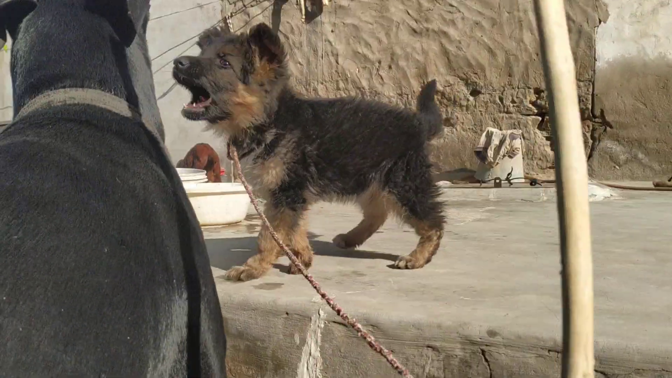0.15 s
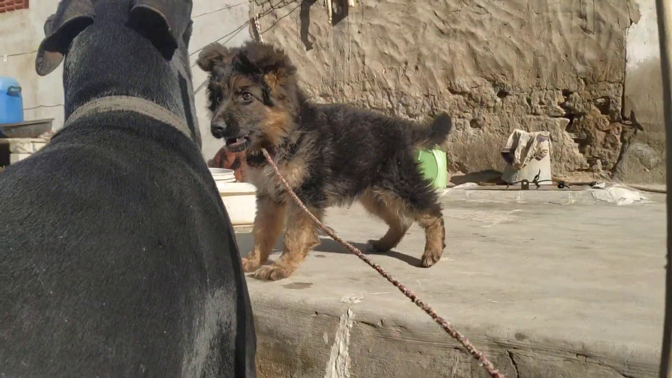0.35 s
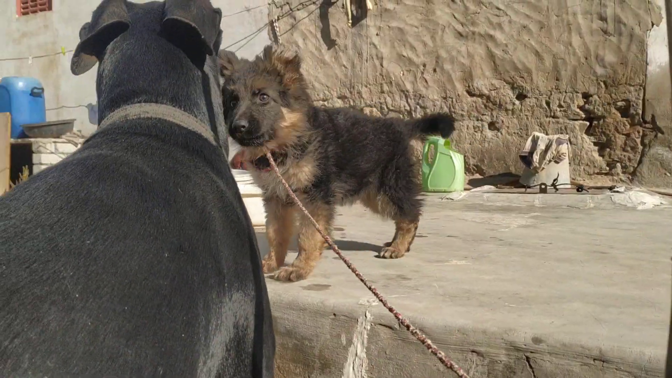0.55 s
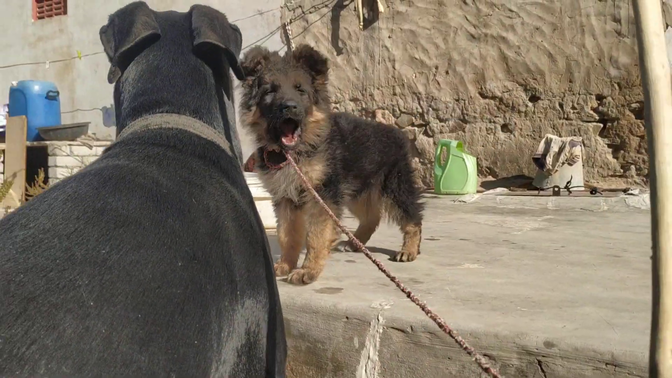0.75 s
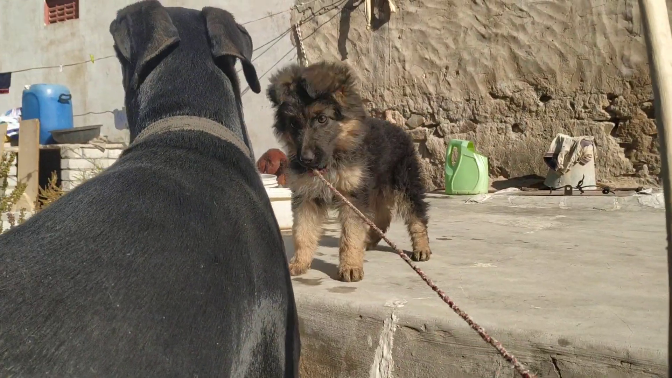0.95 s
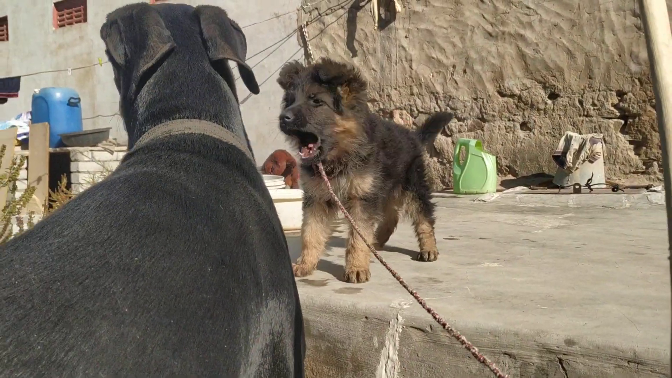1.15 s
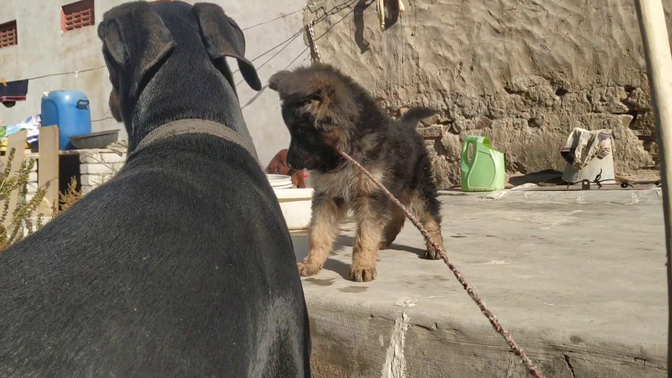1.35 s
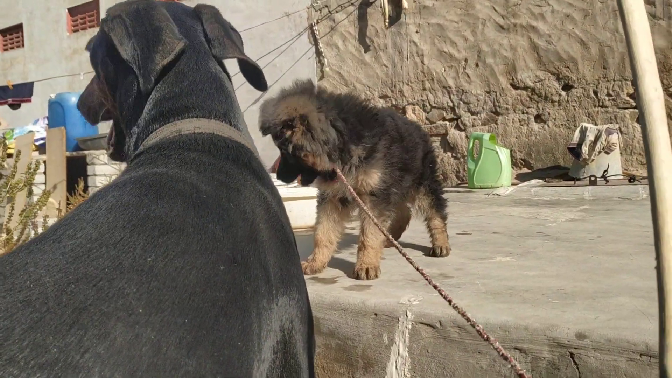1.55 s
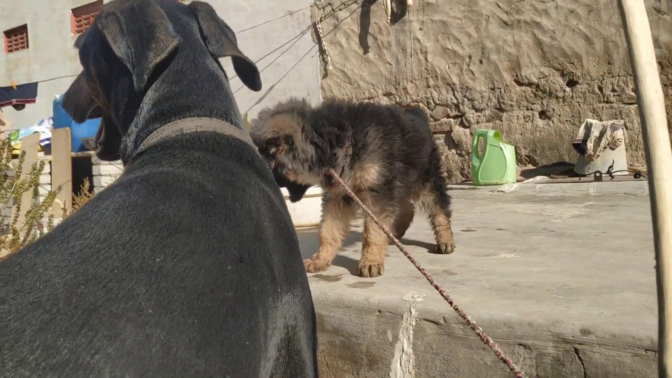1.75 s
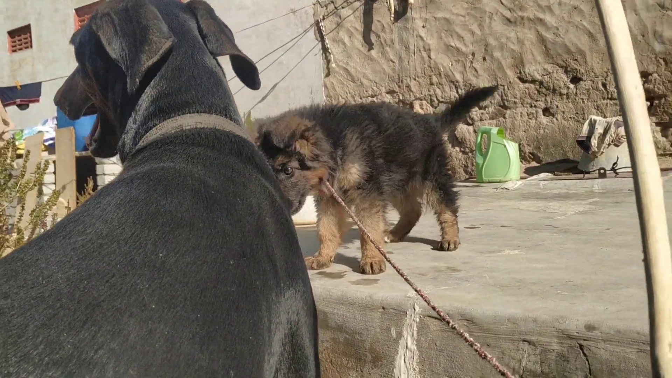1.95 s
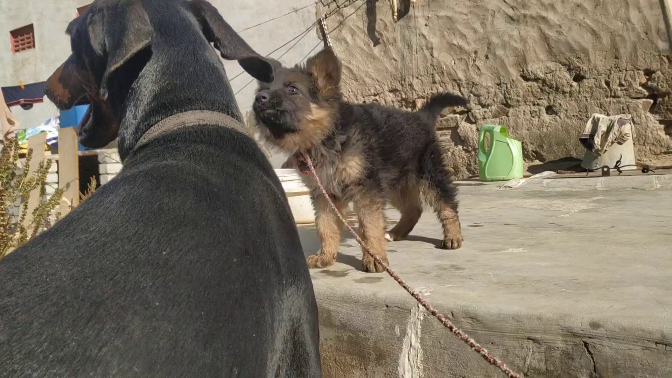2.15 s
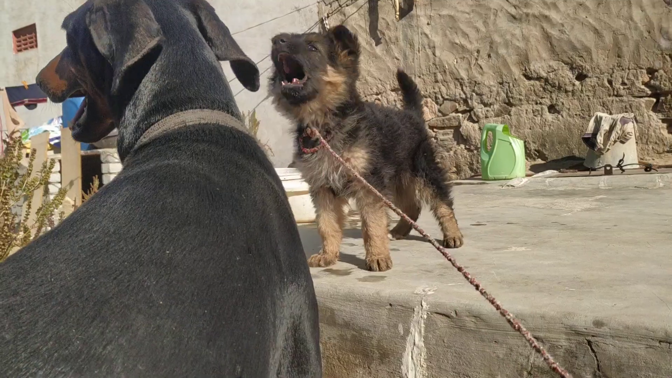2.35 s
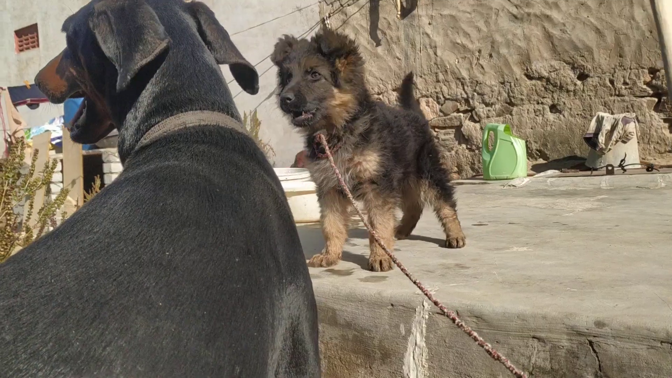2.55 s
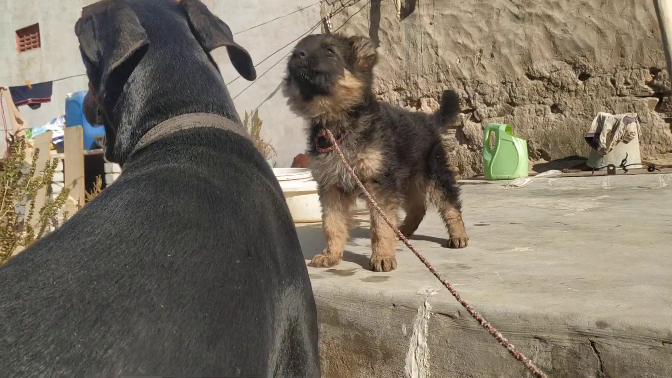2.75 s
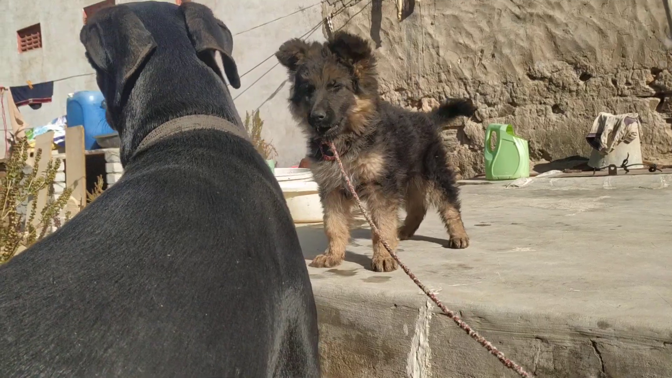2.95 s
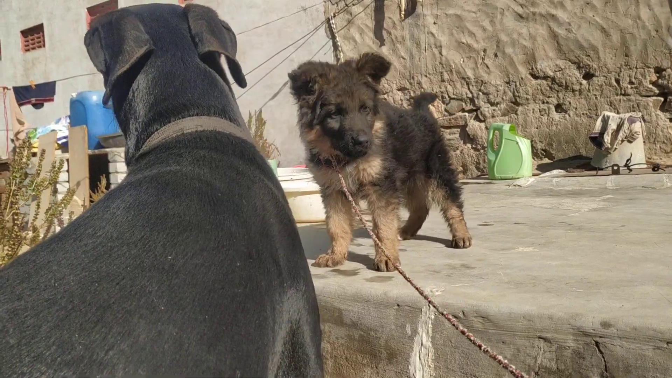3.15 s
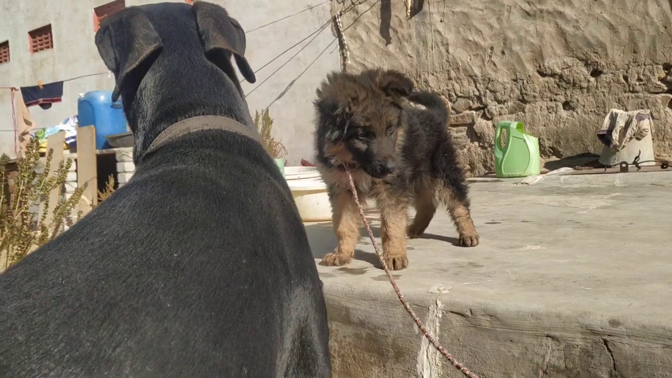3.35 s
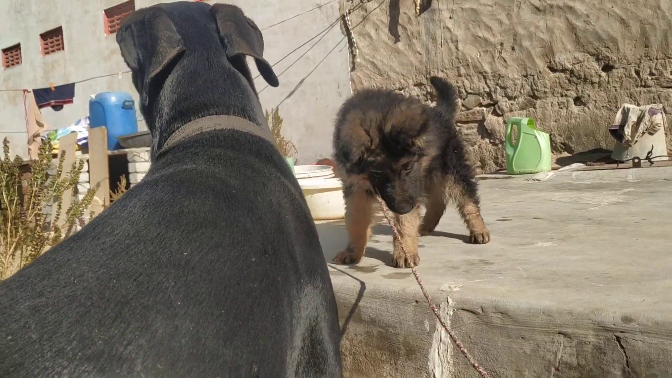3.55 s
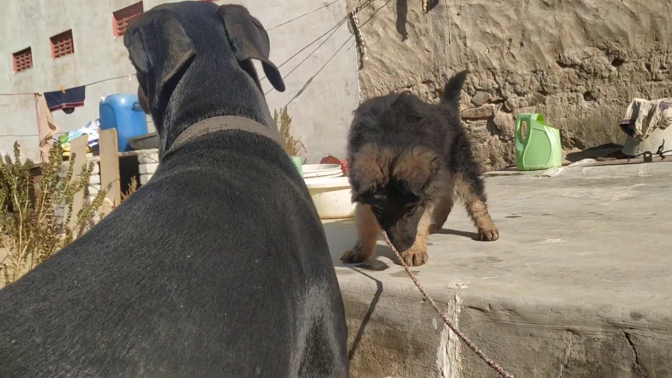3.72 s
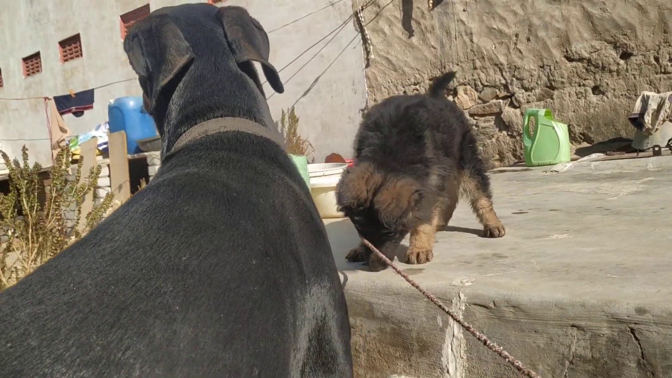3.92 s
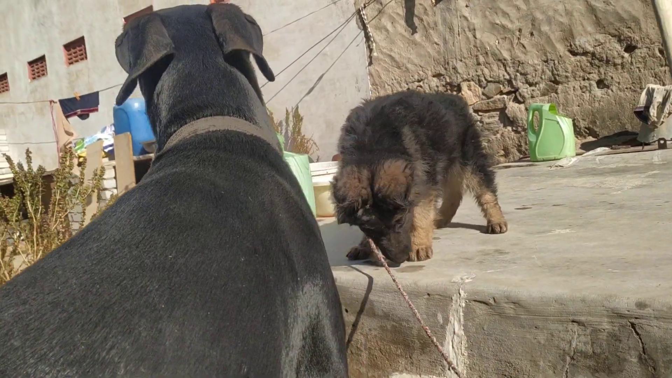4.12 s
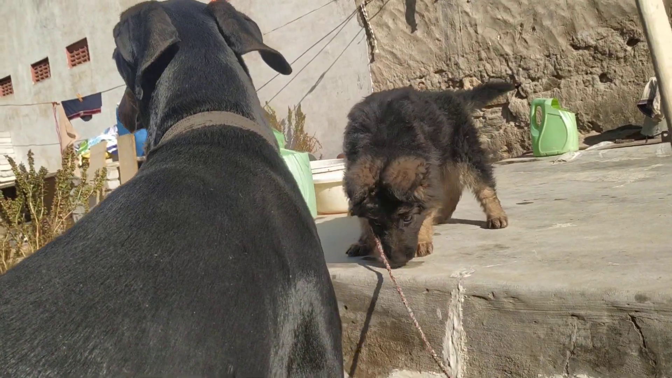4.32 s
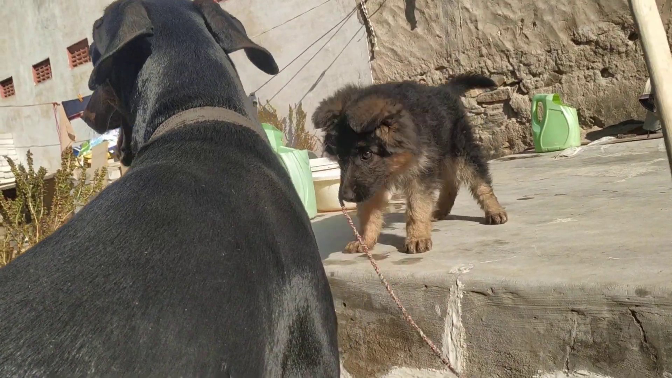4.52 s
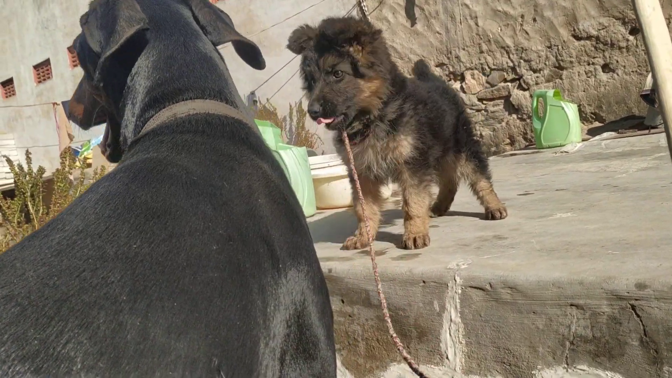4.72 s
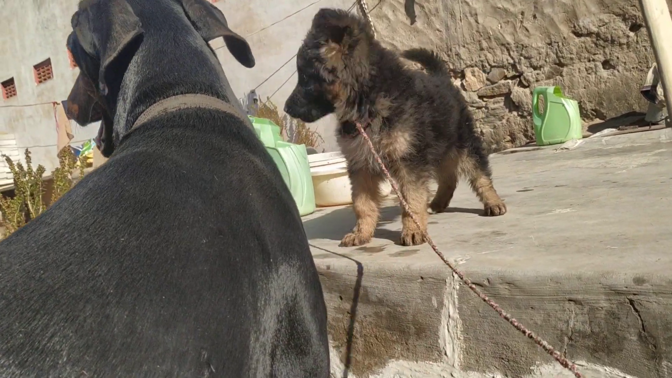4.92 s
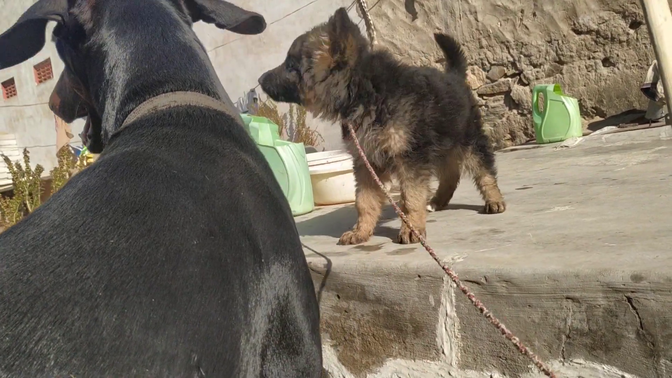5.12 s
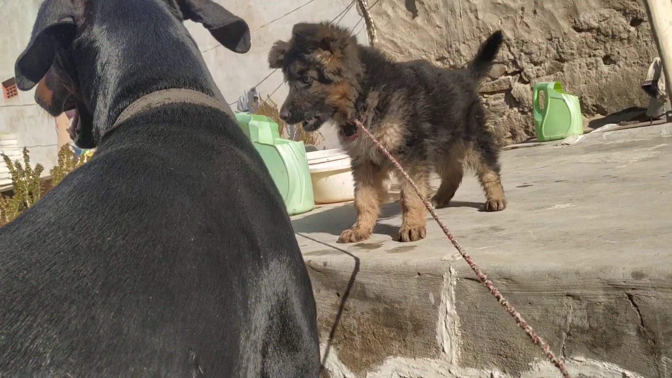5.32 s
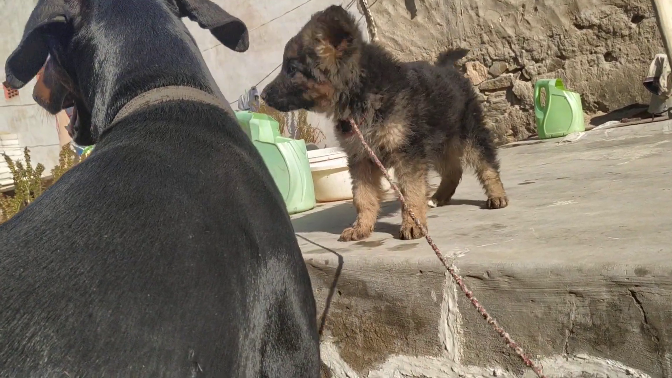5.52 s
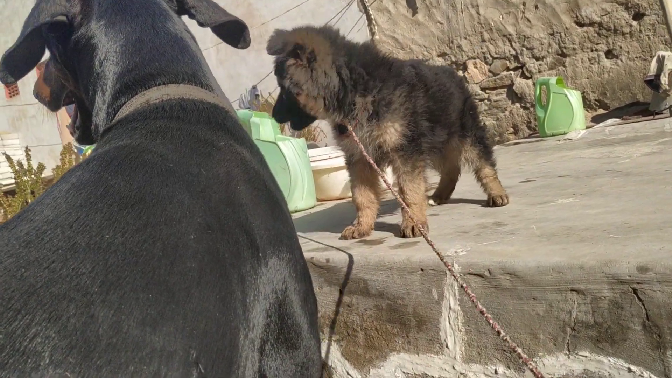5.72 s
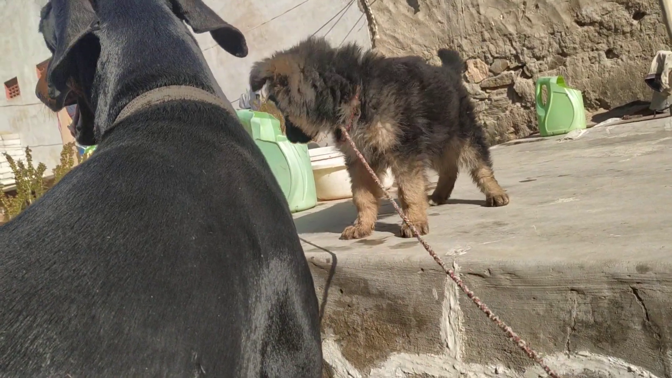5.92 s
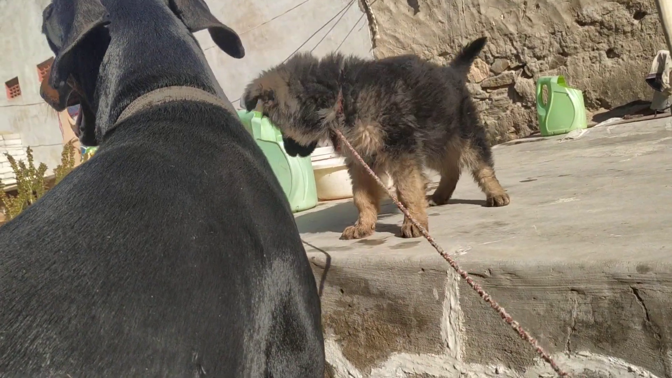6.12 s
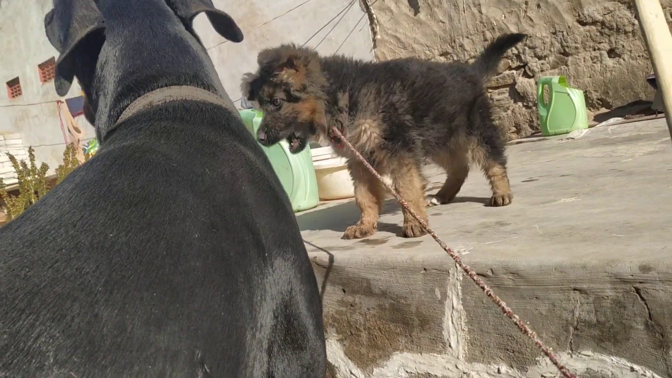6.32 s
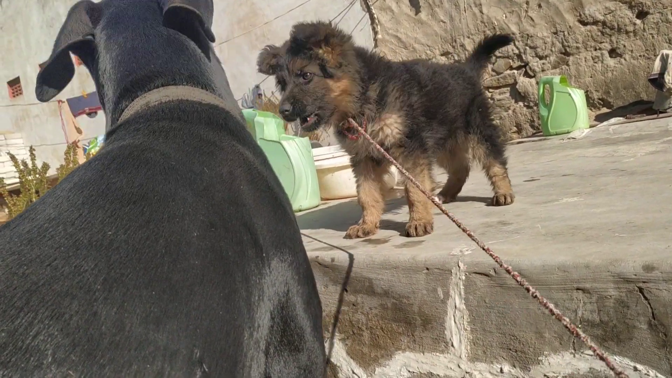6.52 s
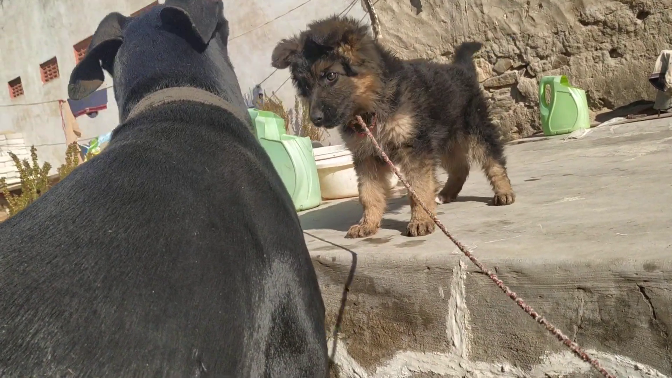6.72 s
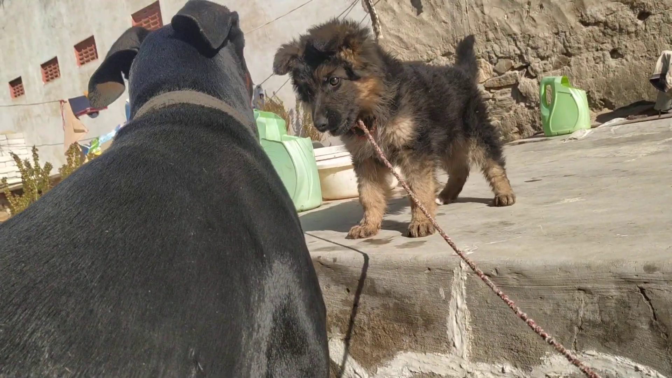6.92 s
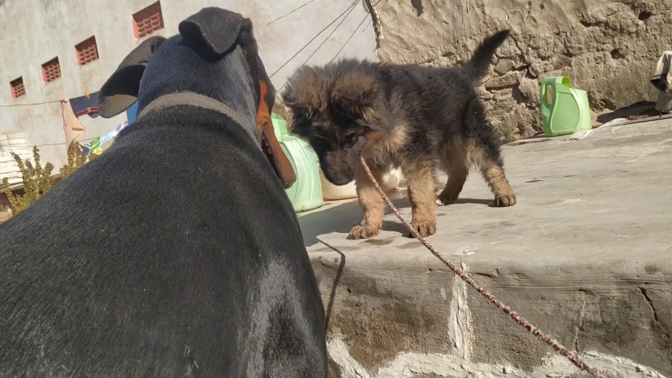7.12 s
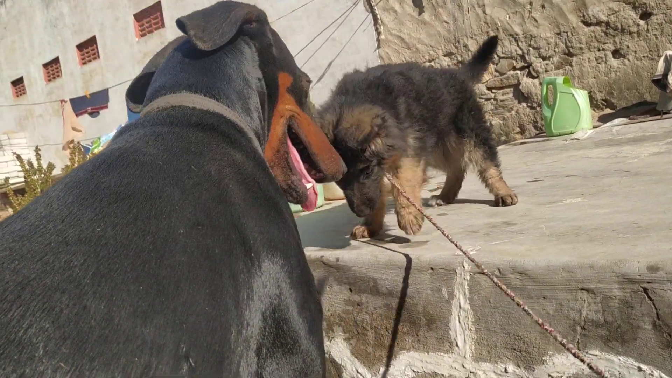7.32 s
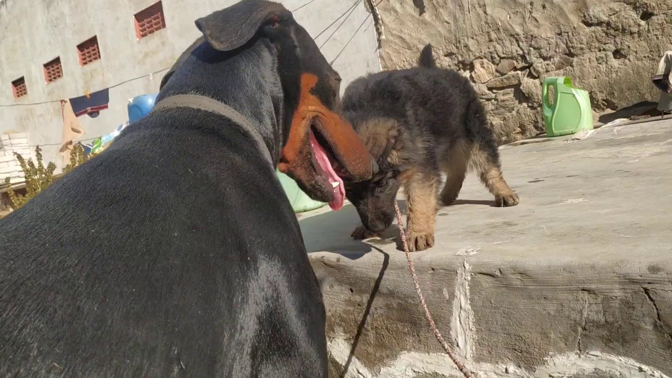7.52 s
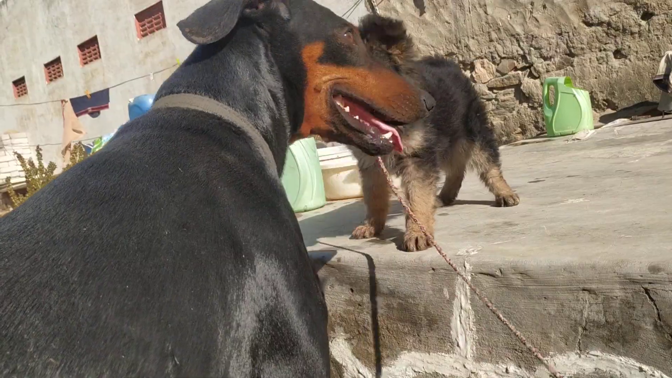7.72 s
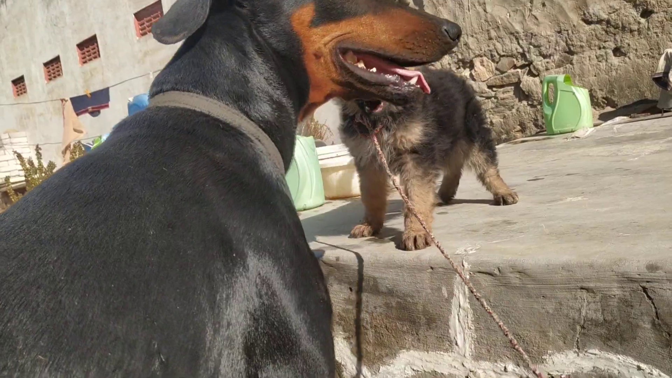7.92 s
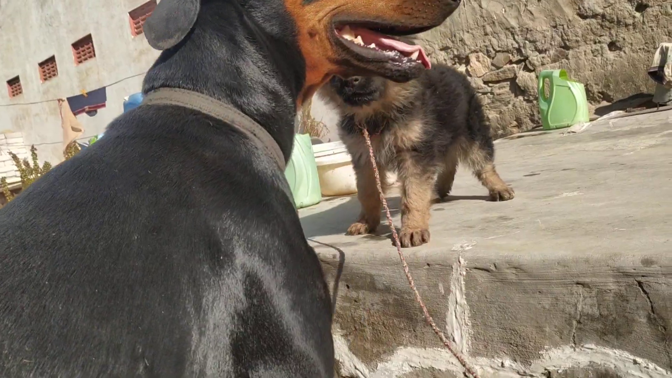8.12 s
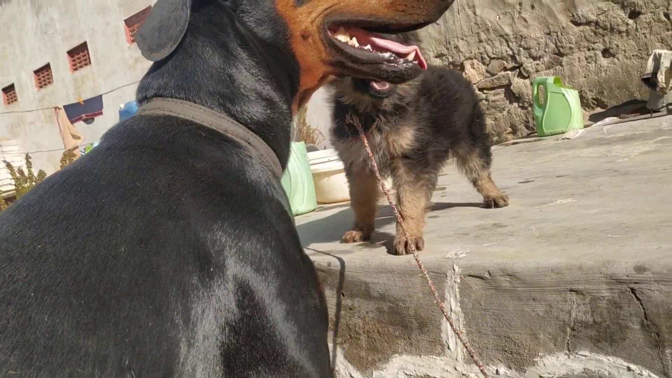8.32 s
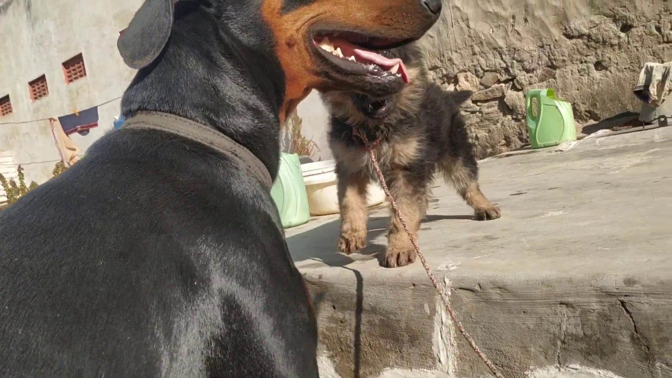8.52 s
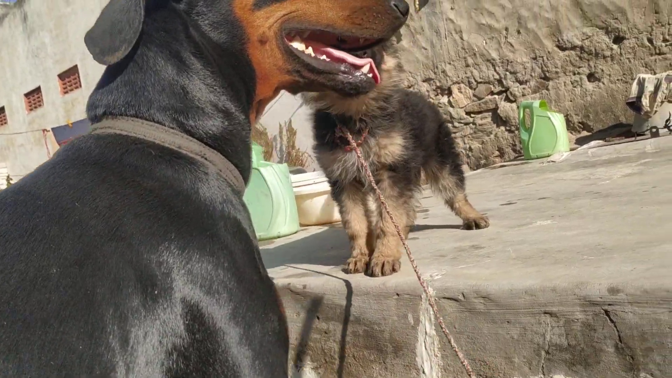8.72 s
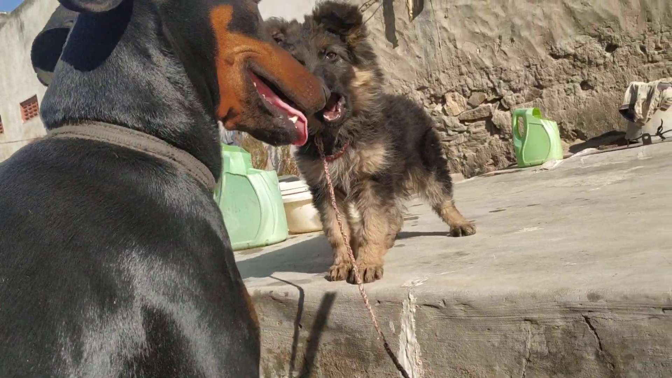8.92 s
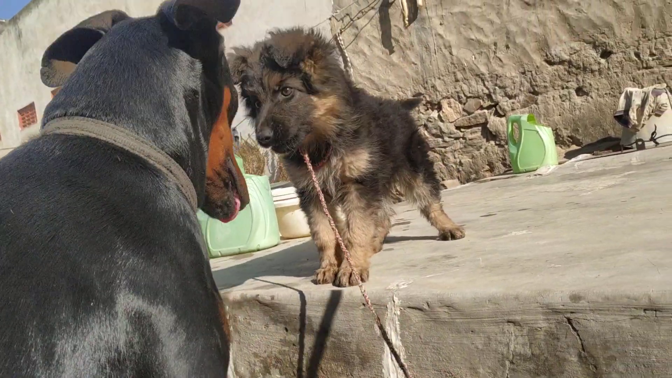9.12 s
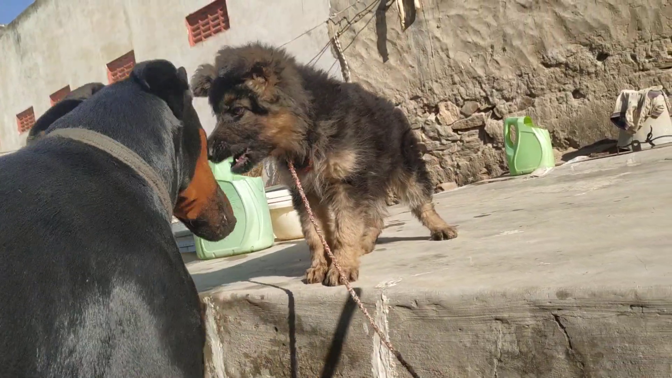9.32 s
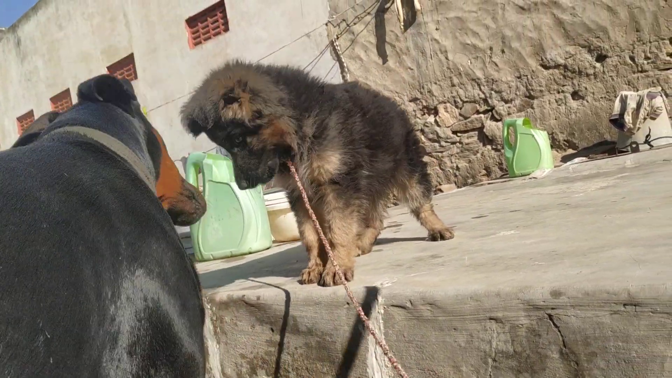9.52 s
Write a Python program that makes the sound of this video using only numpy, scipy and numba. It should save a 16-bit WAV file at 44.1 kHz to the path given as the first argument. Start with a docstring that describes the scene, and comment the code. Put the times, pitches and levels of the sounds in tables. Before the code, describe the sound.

A young puppy on a concrete step barks close to the microphone, in two runs of quick, sharp yaps about a third of a second apart, with a pause of under a second between. Many barks crack into rasp and end in a tiny growl. Walls answer briefly; paws and leash scuff softly over low rumble, hiss and light wind.

```python
"""Sharp barks in two runs, with one low, flat grunt: a puppy on a concrete step in a walled yard, a metre or two
from the microphone. Each bark is an arch of pitch that starts clear, often breaks into rasp at its crest and sinks
into a short growl; vocal-fold harmonics and noise ring in throat and muzzle, with shaped noise at the teeth.
Paws and leash scuff the concrete as noise swells, with a few claw ticks; decaying noise makes the walls answer.
An earlier bark's ring dies at the opening, then faint narrow rings, over low rumble, wide hiss and light wind."""
import sys
import numpy as np
from scipy import signal
from scipy.fft import rfft, irfft, next_fast_len
from scipy.io import wavfile
from scipy.ndimage import uniform_filter1d
from numba import njit

SR = 44100
rng = np.random.default_rng(int(sys.argv[2]) if len(sys.argv) > 2 else 0)


def transcribe(u):
    """Save the signal u as a 16-bit wav file named by the first command-line argument.

    u: samples, shape (n,) or (channels, n), limited to [-1, 1]; the rate is SR.
    q: integer samples, one column per channel.
    """
    v = np.clip(np.atleast_2d(u).T, -1, 1)
    q = np.round(v * 32767).astype(np.int16)
    wavfile.write(sys.argv[1], SR, q)


N = 426006
TIME = np.arange(N) / SR

# barks, each an arch of pitch, and one low, flat grunt at 7.64 s:
# start t/s, length t/s, attack t/s, start to crest t/s, rise t/s, fall t/s,
# crest f/Hz, throat level/dB and muzzle level/dB (relative, before each part's trim), roughness/0-1 before and
# after the crest, jaw resonance f/Hz (open mouth), muzzle resonance f/Hz (at the crest), bared-teeth level/dB
BARKS = [ (0.093, 0.17, .018, 0.076, 0.058, 0.043, 587.6, -18.5, -14, 0.25, 0.75, 1076, 1890, 5.5),
         (.418, .171, .015, .068, 0.063, 0.054, 596, -20, -14.5, 0.28, 0.76, 1074, 1942, 3.5),
         (.751, 0.18, .014, 0.07, .063, 0.045, 587, -19, -14.5, 0.29, .8, 1100, 1834, 5),
         (1.128, 0.17, .014, 0.067, 0.061, 0.056, 596, -19, -14, 0.61, .78, 1130, 1961, 1),
         (1.693, 0.21, .03, 0.096, .05, .059, 604.5, -19.5, -16, .3, 0.77, 1076, 1929, 1),
         (2.071, 0.21, .016, 0.045, 0.034, 0.075, 700, -17.5, -13.5, .52, 0.65, 1267, 2035, 1),
         (2.281, 0.17, .016, 0.088, 0.071, 0.045, 547, -18.5, -15.5, 0.3, 0.77, 1067, 1900, 3.5),
         (2.648, .17, .014, 0.075, 0.069, 0.048, 585.4, -19, -14.5, 0.36, 0.8, 1084, 1899, 3),
         (3.012, 0.15, .018, .067, 0.048, .042, 760, -19, -15.5, 0.4, 0.4, 1110, 1920, 2),
         (3.368, .2, .035, 0.095, 0.039, 0.043, 677.3, -20.5, -17.5, 0.13, 0.23, 1139, 1966, 2),
         (3.747, 0.14, .025, 0.06, 0.036, 0.045, 434.3, -24, -18.5, 0.38, 0.52, 934.6, 2043, 1),
         (4.734, 0.14, .02, .067, 0.07, 0.044, 751.7, -18.5, -14, 0.5, .7, 1245, 2024, 1),
         (5.002, 0.17, .014, 0.078, 0.06, .046, 632, -17, -14.5, 0.28, 0.8, 1236, 2068, -1.5),
         (5.354, .165, .016, 0.08, 0.06, 0.047, 613, -18.5, -14.5, .2, 0.83, 1135, 1980, 0.5),
         (5.699, 0.13, .03, 0.077, .032, .05, 337.6, -28, -26.5, 0.26, .35, 943.4, 1940, 1),
         (6.171, 0.26, .03, 0.14, 0.049, 0.042, 489, -23, -22.5, .3, 0.5, 998.5, 1950, 1.5),
         (6.391, 0.27, .02, .1, .047, .065, 428, -24, -21, .2, 0.38, 902, 1888, 4.5),
         (6.96, 0.2, .025, 0.093, 0.036, .041, 678.6, -22, -18.5, 0.14, .2, 1266, 2085, -3.5),
         (7.342, 0.13, .016, 0.067, 0.035, 0.029, 709.7, -21, -14.5, 0.16, .45, 1170, 2055, -1.5),
         (7.636, 0.094, .04, 0.064, 0.034, 0.032, 158.1, -41, -50.5, .15, 0.3, 950, 2000, 5),
         (7.881, 0.27, .03, .13, 0.044, 0.069, 349.8, -21.5, -20, 0.24, 0.13, 1087, 1934, 1.5),
         (8.319, 0.15, .016, .059, 0.054, .062, 709.2, -17.5, -14, 0.55, .7, 1120, 2033, 0.5),
         (8.586, 0.18, .014, 0.06, 0.065, 0.058, 709.6, -18, -12.5, 0.59, 0.71, 1113, 1934, 0),
         (8.936, 0.11, .018, .051, 0.036, .038, 695.4, -20, -17, 0.22, .2, 1237, 1980, 3.5)]

# place on a bark's bell-shaped course: in rise times before the crest (negative), in fall times after it
OPEN_AT = -0.73  # place where the mouth is wide open
SHUT_AT, SHUT_OVER = 0.55, 0.56  # place where the mouth starts to shut, and how long that takes


def puppy(throat_db=3, mouth_db=2.5, fundamental_db=-20, growl_db=4, growl_hz=205, shut_share=0.46,
          yelp_db=-8, yelp_hz=640, pharynx_db=-9, teeth_db=-27, teeth_waver_db=2):
    """The folds drive throat and muzzle; the fundamental stands out in low growls and in the highest yelps."""
    # muzzle resonances, jaw half open: f/Hz (all scaled with each bark's muzzle), width of one pass f/Hz,
    # relative level/dB
    muzzle_modes = [(1948, 480, 8.5), (2270, 680, 6), (2767, 215, 5.5), (3395, 478, 3.5), (4010, 1700, -16)]
    # spectrum of the air at the teeth during a bark: f/Hz, level/dB
    teeth_air = [(3000, -27.5), (4400, 5.5), (5200, 6.5), (5750, 11.5), (6500, -23), (8500, 6), (10500, 11),
                 (14000, 12.5), (16000, -10)]
    rasp_loss_db = 6.5  # loss per unit of roughness: a broken voice is weaker than a clear one

    pitch, rough, jaw_hz, muzzle_hz, bright_db, shut = contour()
    folds, fundamental = larynx(pitch, rough)
    low_pitch = 1 / (1 + (pitch / growl_hz) ** 8)
    closed = np.maximum(shut_share * shut, low_pitch)
    yelp = 1 / (1 + (yelp_hz / pitch) ** 12)

    # as the jaw closes its resonance sinks and the pharynx takes over
    jaw = resonance(folds, jaw_hz * (1 - 0.19 * closed), 509)
    pharynx = undb(pharynx_db) * (0.24 + 3 * closed) * resonance(folds, 615.0, 230)
    fundamental_gain = undb(fundamental_db) + undb(growl_db) * closed + undb(yelp_db) * yelp
    throat = steady(jaw + pharynx, share=0.16) + fundamental_gain * fundamental
    throat = steady(throat, share=0.37)

    # the muzzle resonances move together, bared teeth favour the upper ones, tongue and lips make each waver
    mouth = 0
    for hz, width, db in muzzle_modes:
        waver_db = 2.5 * flutter(25)
        gain = undb(db + waver_db + bright_db * (hz > 2500))
        centre_hz = hz * muzzle_hz / muzzle_modes[0][0]
        mouth = mouth + gain * resonance(folds, centre_hz, width)
    mouth = steady(cut(mouth, 4415, "low", order=10), share=0.5)

    teeth_gain = undb(bright_db + teeth_waver_db * flutter(23))
    pulsed_air = rng.standard_normal(N) * (1 + .5 * fundamental)
    teeth = teeth_gain * steady(colour(pulsed_air, teeth_air))

    # the bright part dies first as the mouth shuts
    throat_levels, muzzle_levels = np.transpose(BARKS)[7:9]
    throat_gain = effort(throat_levels, swell_db=17, shut_db=11, fade_db=8.5, release_s=0.02)
    mouth_gain = effort(muzzle_levels, swell_db=27.5, shut_db=24.5, fade_db=15.5, release_s=0.035)
    bright_part = mouth_gain * (undb(mouth_db) * mouth + undb(teeth_db) * teeth)
    voice = undb(throat_db) * throat_gain * throat + bright_part
    return voice * undb(-rasp_loss_db * rough)


def contour():
    """Pitch, roughness and mouth shape at every moment; pitch bends to each crest, roughness shifts near it."""
    slack_hz = 160.6  # pitch of the relaxed folds
    taut_from = 0.41  # share of the bell's height above which the folds are taut
    break_at, break_over = -.1, .25  # place where the roughness shifts, and how long that takes
    onset_rough, growl_rough = .4, .24  # slack folds before and after the crest, 0-1
    muzzle_glide = 0.031  # share by which the muzzle climbs per rise or fall time as the lips draw back
    controls = np.zeros((6, N))
    for k, bark in enumerate(BARKS):
        crest_hz, _, _, rough_before, rough_after, jaw_hz, muzzle_hz, bright_db = bark[6:]
        on = (TIME >= bark[0]) | (k == 0)  # each bark's settings hold until the next
        u = place(bark)[on]
        bell = np.exp(-np.minimum(u * u, 20))
        broken = np.clip((u - break_at) / break_over + .5, 0, 1)
        strained = rough_before + (rough_after - rough_before) * broken
        slack = np.where(u < 0, onset_rough, growl_rough)
        rough = slack + (strained - slack) * np.minimum(bell / taut_from, 1)
        controls[0, on] = slack_hz + (crest_hz - slack_hz) * bell
        controls[1, on] = np.clip(rough, .02, .97)
        controls[2, on] = jaw_hz
        controls[3, on] = muzzle_hz * (1 + muzzle_glide * np.clip(u, -1, 1))
        controls[4, on] = bright_db
        controls[5, on] = shutting(u)
    return controls


def place(bark):
    """Place on one bark's course at every moment; 0 at the crest."""
    start, _, _, crest, rise, fall = bark[:6]
    since = TIME - start - crest
    return since / np.where(since < 0, rise, fall)


def shutting(u):
    """How far the mouth has shut after the crest, 0-1."""
    return np.clip((u - SHUT_AT) / SHUT_OVER, 0, 1)


def larynx(pitch, rough, jitter=0.044, wobble=0.02018, half_db=-5, rasp_db=3, tilt=0.7, count=16):
    """Harmonics of the vocal folds; with roughness the cycles jitter, alternate in strength and break into noise."""
    unsteady = jitter * cut(flutter(200), 37, "high", order=1) + wobble * flutter(48.2)
    phase = 2 * np.pi * np.cumsum(pitch * (1 + rough * unsteady)) / SR
    tone = sum(np.sin(k * phase) / k ** tilt for k in range(1, count + 1))
    alternation = np.sin(phase / 2) + flutter(210)  # half the pitch, plus random strength
    tone = unit(tone) * (1 + undb(half_db) * rough * alternation)
    # slack, slow folds leak more air
    leak = rough ** 2 + .2 / (1 + (pitch / 300) ** 4)
    air_noise = unit(cut(rng.standard_normal(N), 3200, "low", order=2))
    rasp = air_noise * (1 + 0.91 * np.cos(phase))
    return np.sqrt(1 - rough ** 2) * tone + undb(rasp_db) * leak * rasp, np.sin(phase)


def effort(levels, swell_db, shut_db, fade_db, release_s):
    """Gain of one voice part: it swells to the crest, holds, drops as the mouth shuts and fades to the end."""
    attack_db = 23  # the voice starts this far down and catches within its attack time
    gain = np.zeros(N)
    for bark, db in zip(BARKS, levels):
        start, length, attack_s = bark[:3]
        on = (TIME > start) & (TIME < start + length)
        age, u = TIME[on] - start, place(bark)[on]
        attack = attack_db * np.maximum(1 - age / attack_s, 0)
        swell = swell_db * np.maximum(OPEN_AT - u, 0)
        growl_span = max(u[-1] - SHUT_AT, .5)
        fade = fade_db * np.clip((u - SHUT_AT) / growl_span, 0, 1)
        release = np.minimum((length - age) / release_s, 1)
        gain[on] += undb(db - attack - swell - shut_db * shutting(u) - fade) * release
    return gain


def ports(x):
    """The direct sound reaches the two microphone ports with different delay and shading."""
    # left minus right: f/Hz, level/dB
    port_balance = [(200, -3), (400, -4.5), (800, 2.5), (1100, -1), (1310, -3), (1780, 1.5), (2000, 10),
                    (2250, 12.5), (2500, -2.5), (2850, -8), (3200, 7.5), (4400, -8), (15000, -3.5)]
    # how far the left leads: f/Hz, phase/rad
    port_phase = [(20, 0), (780, -.4), (1190, -1.8), (1400, -.8), (1850, -.8), (2450, -5), (2930, -6.3),
                  (3300, -9.7), (3800, -12.5), (4400, -13.2), (5600, -18.4), (15500, -33)]
    size = next_fast_len(N)
    hz = np.fft.rfftfreq(size, 1 / SR)
    half = undb(along(port_balance, hz) / 2)
    lead = np.exp(1j * np.interp(hz, *np.transpose(port_phase)))
    return irfft(rfft(x, size) * np.array([half * lead, 1 / half]), size)[:, :N]


def yard(x, near_db=-8.0, near_t60=0.24, far_db=-22.5, far_t60=0.98, first_s=0.00073):
    """Separate slaps from step and near walls, then a faint long wash from the houses around."""
    # spectrum of the answer: f/Hz, level/dB
    wall_colour = [(150, 6.5), (500, 4), (1100, -2.5), (1500, -4), (2500, 0.5),
                   (4000, 2.5), (7000, 14), (14000, -6.5)]
    t = np.arange(SR) / SR
    arrive = np.clip((t - first_s) / .004, 0, 1)
    # sparse at first, denser with time
    slaps = rng.standard_normal((2, SR)) * (rng.random((2, SR)) < .02 + t)
    slaps = slaps * arrive * undb(-60 * t / near_t60)
    wash = rng.standard_normal((2, SR)) * (1 - np.exp(-t / 0.0022)) * undb(-60 * t / far_t60)
    response = (undb(near_db) * unit(slaps) + undb(far_db) * unit(wash)) / np.sqrt(SR)
    # long waves reach both ports alike
    low_difference = cut(response[0] - response[1], 540, "low", order=1)
    response = response + low_difference * np.array([[0], [1]])
    return signal.fftconvolve(x[None], colour(response, wall_colour), axes=1)[:, :N]


def ringing():
    """The dying ring of an earlier bark at the opening, then faint tones: swells of noise through resonances."""
    # the first two rows are the earlier bark's ring, the rest faint tones:
    # middle t/s, length t/s, f/Hz, width of one pass f/Hz, peak level/dB
    rings = [(0.015, 0.15, 2270, 1100, -42.5), (0.025, 0.22, 1070, 170, -44), (0.355, 0.14, 3420, 89, -45),
             (2.016, 0.35, 175, 13, -48), (2.88, .3, 168.6, 19.9, -48.5), (5.277, 0.26, 537.8, 33, -56.5),
             (6.8, 0.41, 655, 48.5, -63), (9.206, .2, 639.8, 71, -68.5)]
    noise = rng.standard_normal(N)
    total = 0
    for middle, length, hz, width, db in rings:
        swell = np.exp(-(2 * (TIME - middle) / length) ** 2)
        total = total + undb(db) * swell * unit(resonance(noise, hz, width))
    return total


def paws(grain_db=2, tick_t60=0.046):
    """Gritty scuffs of paws and leash as wavering noise, and a few claw ticks as short noise decays."""
    # scuffs on the concrete: middle t/s, length t/s, level/dB (at the middle, before the grain)
    scuffs = [(0.092, 0.096, -37), (1.015, 0.24, -48.5), (1.654, .24, -42), (3.357, .18, -43.5),
              (3.97, 0.13, -49), (4.1, 0.15, -43), (4.714, 0.36, -48.5), (5.646, 0.15, -42.5),
              (6.3, .16, -42), (6.791, 0.48, -55.5), (7.067, 0.21, -43.5), (7.701, 0.12, -44.5),
              (8.004, 0.24, -54), (8.801, 0.15, -50.5), (9.131, 0.17, -48.5)]
    # spectrum of the grit: f/Hz, level/dB
    scuff_colour = [(1760, -21), (3000, -18), (3820, -17), (4790, -18.5), (6990, -12.5), (7690, -12.5),
                    (13100, -18), (15500, -12.5)]
    # claw ticks: t/s, level/dB
    ticks = [(4.379, -54), (4.392, -61), (5.894, -46), (9.446, -70), (9.548, -50), (9.562, -51)]
    slide = sum(undb(db) * np.exp(-(2 * (TIME - s) / length) ** 2) for s, length, db in scuffs)
    grit = unit(colour(rng.standard_normal((2, N)), scuff_colour)) * undb(grain_db * flutter(70))
    taps = 0
    for s, db in ticks:
        decay_db = 60 * np.clip((TIME - s) / tick_t60, 0, 2)
        taps = taps + undb(db - decay_db) * (TIME >= s)
    tick_colour = [(400, -20), (2000, -1), (6000, 8), (15000, 0.0)]  # f/Hz, level/dB
    click = unit(colour(rng.standard_normal((2, N)), tick_colour))
    return slide * grit + taps * click


def outdoors(rumble_db=3, hiss_db=-59, split_hz=450, side_db=-15, wind_db=-61, wind_hz=35, gust_db=1.0):
    """A wavering distant rumble, nearly alike at both ports, a smooth wide hiss, and light wind on each port."""
    # spectrum of the outdoor air: f/Hz, level/dB
    air = [(20, -5.5), (45, -8.5), (130, -7.5), (200, -11), (300, -21), (600, -19), (1400, -22.5),
           (3000, -20), (5000, -27), (10000, -29.5), (15500, -41)]
    # course of the rumble: t/s, level/dB (before the rumble_db trim)
    rumble_levels = [(0.0, -50), (3.42, -51), (4.06, -53.5), (7.45, -54.5), (7.96, -47.5), (8.53, -55),
                     (9.04, -49.5), (9.66, -57)]
    low = cut(colour(rng.standard_normal((2, N)), air), split_hz, "low", order=2)
    rumble = unit(low[0] + undb(side_db) * low[1] * np.array([[1], [-1]]))
    swell_db = np.interp(TIME, *np.transpose(rumble_levels)) + rumble_db + 1.38 * flutter(6)
    hiss = unit(cut(colour(rng.standard_normal((2, N)), air), split_hz, "high", order=2))
    wind = cut(rng.standard_normal((2, N)), wind_hz, "low", order=3)
    wind = unit(cut(wind, 17, "high", order=2))
    hiss_gain = undb(hiss_db + flutter(2.4))
    wind_gain = undb(wind_db + gust_db * flutter(3))
    return rumble * undb(swell_db) + hiss * hiss_gain + wind * wind_gain


def undb(db):
    """Decibels to gain."""
    return 10 ** (np.asarray(db) / 20)


def unit(x):
    """Scale to rms 1."""
    return x / np.sqrt(np.mean(x ** 2))


def steady(x, share=1):
    """Hold the short-term rms near 1; with a share under 1 a harmonic still swells as it crosses a resonance."""
    power = uniform_filter1d(uniform_filter1d(x * x, size=400), size=400)
    power = np.abs(power) + 1e-12
    slow = np.abs(uniform_filter1d(power, size=3000)) + 1e-12
    return x / np.sqrt(power ** share * slow ** (1 - share))


def along(points, hz):
    """Read a (f/Hz, value) table on a log-frequency axis."""
    f, value = np.transpose(points)
    return np.interp(np.log(hz + 1e-3), np.log(f), value)


def colour(x, points):
    """Shape a sound with a (f/Hz, level/dB) spectrum."""
    size = next_fast_len(x.shape[-1])
    gain = undb(along(points, np.fft.rfftfreq(size, 1 / SR)))
    return irfft(rfft(x, size) * gain, size)[..., :x.shape[-1]]


def cut(x, hz, kind, order):
    """Butterworth low-pass or high-pass."""
    return signal.sosfilt(signal.butter(order, min(hz, .45 * SR), kind, fs=SR, output="sos"), x)


def flutter(hz):
    """Random wavering up to about a given rate, spread 1."""
    return unit(cut(rng.standard_normal(N), hz, "low", order=2))


@njit
def svf(x, hz, width):
    """State-variable band-pass with a moving centre."""
    y = np.empty(len(x))
    band, low = 0., 0.
    for i in range(len(x)):
        g = np.tan(np.pi * hz[i] / SR)
        damping = width / hz[i]
        v = (band + g * (x[i] - low)) / (1 + g * (g + damping))
        band = 2 * v - band
        low = low + 2 * g * v
        y[i] = damping * v
    return y


def resonance(x, hz, width):
    """A resonance applied twice, for steep skirts."""
    centre = hz * np.ones(N)
    once = svf(x, centre, float(width))
    return svf(once, centre, float(width))


def scene():
    """The puppy, its yard and the background."""
    voice = puppy()
    return ports(voice + ringing()) + yard(voice) + paws() + outdoors()


def record(dry):
    """The recorder rounds the loudest peaks and cuts the top."""
    top_hz = 15800
    rounded = np.tanh(.9 * dry) / .9
    return signal.sosfilt(signal.ellip(10, .2, 80, top_hz, fs=SR, output="sos"), rounded)


dry = scene()
out = record(dry)
transcribe(out)
```